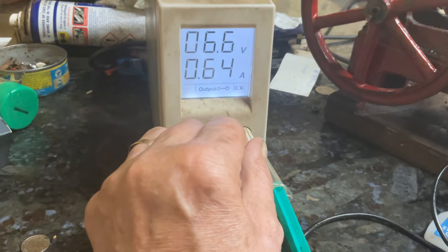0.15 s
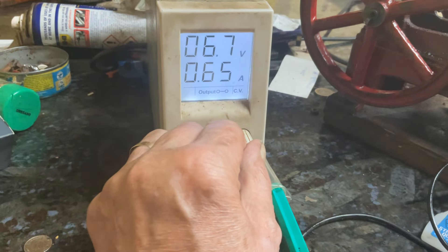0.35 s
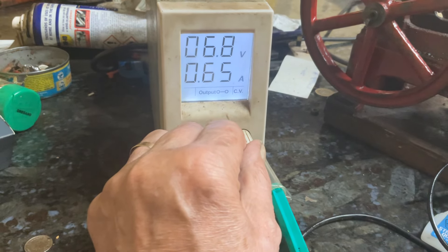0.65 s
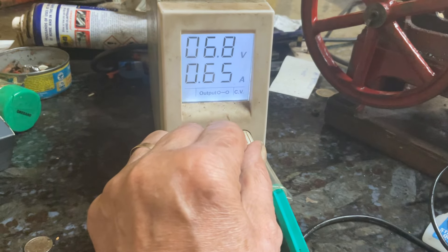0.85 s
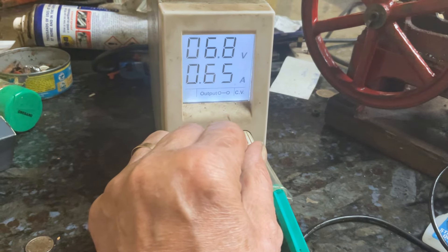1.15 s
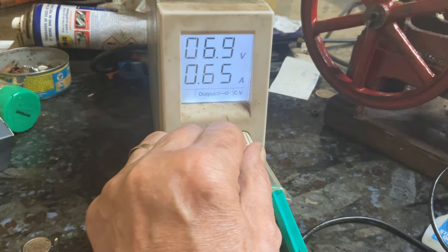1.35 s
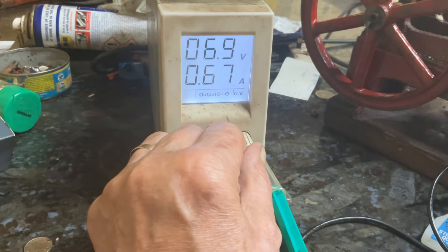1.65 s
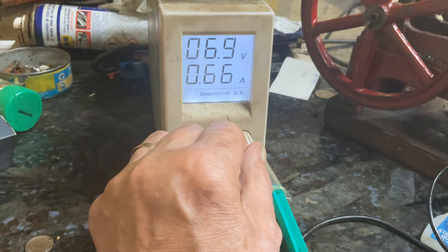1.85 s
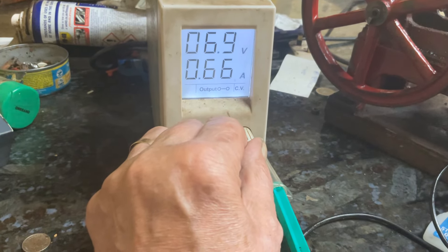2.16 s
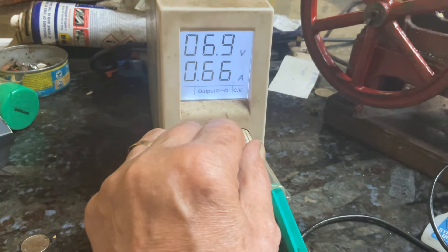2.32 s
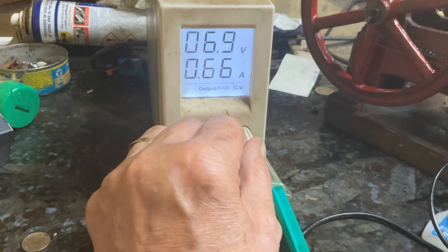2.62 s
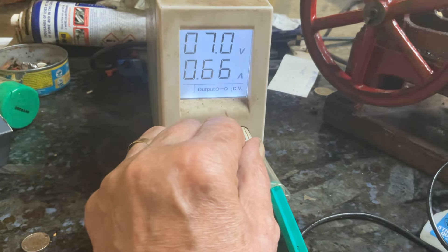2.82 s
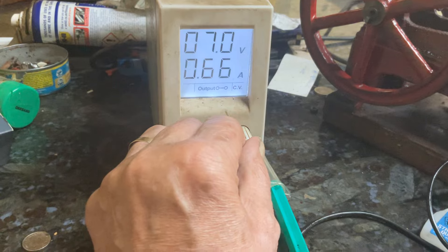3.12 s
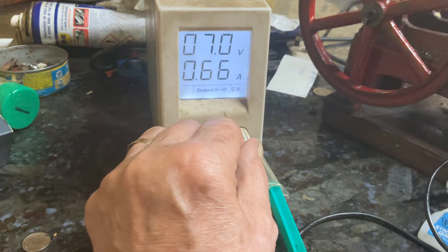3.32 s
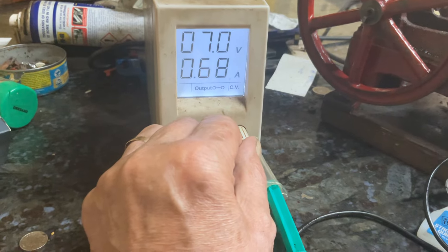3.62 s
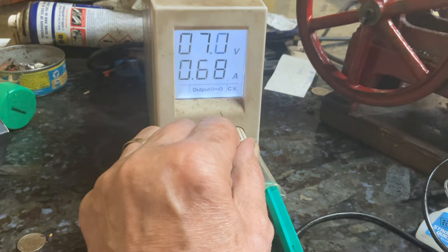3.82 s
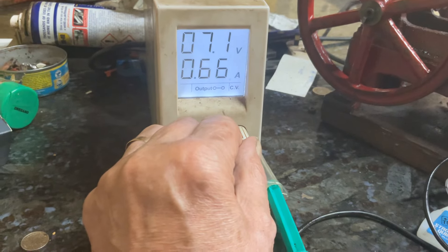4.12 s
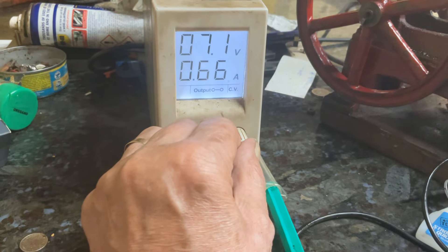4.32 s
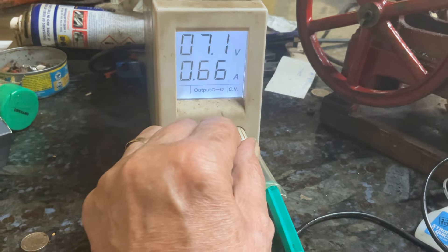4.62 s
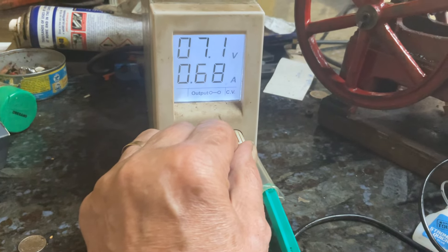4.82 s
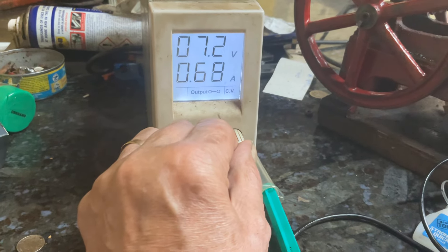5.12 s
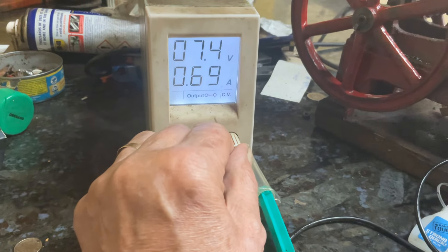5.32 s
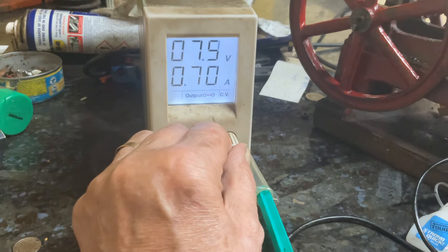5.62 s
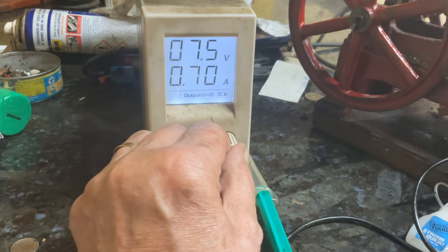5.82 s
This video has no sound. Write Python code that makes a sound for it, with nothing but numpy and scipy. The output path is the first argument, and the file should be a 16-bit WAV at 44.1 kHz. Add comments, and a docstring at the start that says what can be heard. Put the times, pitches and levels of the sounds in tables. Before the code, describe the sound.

Close, harsh electrical crackling runs from start to finish: dense, bright sparks across a plug gap, with a metallic ring and piercing top hiss. The pace rises unevenly, with short spurts. Beneath it, random dull pops and thumps dropping in pitch buffet the microphone, strongest between two and three and a half seconds. A small hard workshop adds short reflections and quiet steady air noise.

```python
"""An ignition unit on a workshop bench fires roughly 63 to 81 sparks a second across a plug gap.
Its rate follows its supply, with surges and an overall rise. Each breakdown is an impulse plus arc noise,
coloured by short rings of the plug, bench and wall reflections and a short diffuse tail.
Some sparks jolt the microphone into timed, dispersed thumps, strong to faint, that fall in pitch; soft thumps
flutter between them by chance. Steady noise gives the still air of the workshop."""
import sys
import numpy as np
from scipy import signal
from scipy.fft import rfft, irfft, next_fast_len
from scipy.io import wavfile
from scipy.ndimage import uniform_filter1d

SR = 44100
rng = np.random.default_rng(int(sys.argv[2]) if len(sys.argv) > 2 else 0)


def wav_out(sig):
    """Save sig, one row per channel (or a flat mono array), as 16-bit PCM at SR to the path in sys.argv[1]."""
    wavfile.write(sys.argv[1], SR, np.round(np.clip(np.atleast_2d(sig).T, -1, 1) * 32767).astype(np.int16))


N = 263178

# nominal repetition rate of the oscillator: (t/s, firing rate/Hz)
FIRING_RATE = [(0.0, 66), (0.3, 63), (0.42, 63), (0.7, 66.3), (1.25, 69), (1.42, 75.5), (1.6, 70),
               (2.1, 71), (2.62, 70.5), (2.9, 66.4), (3.3, 69), (3.48, 79), (3.7, 69), (4.4, 70.3),
               (4.62, 81), (4.72, 70.5), (5.15, 74.2), (5.97, 81)]
# timed thumps, from strong to faint: (t/s, relative low-thump level/dB, relative opening-pop level/dB)
TIMED_THUMPS = [(0.001, -17, -11), (0.0115, -26, -15), (0.3439, -17, -9), (0.377, -10, -7),
                (0.408, -10, -14.5), (0.4395, -14.5, -13), (0.5153, -11.5, -10), (0.5311, -13.5, -8),
                (0.5451, -8.5, -5), (0.5604, -22, -14.5), (0.6051, -10, -6.5), (0.649, -16, -23),
                (0.6916, -17, -14), (0.752, -23, -12), (0.7815, -11, -6.5), (0.8104, -23, -10),
                (0.8397, -14, -21), (0.8543, -21.5, -19.5), (0.883, -18, -20.5), (0.9112, -22.5, -15),
                (0.9254, -19, -17), (0.9408, -20.5, -17.5), (0.9993, -19.0, -14.5), (1.0137, -19.0, -15.0),
                (1.027, -23.5, -9), (1.0563, -16.0, -14.5), (1.1131, -28, -15), (1.1412, -18, -20.0),
                (1.1555, -12.5, -6), (1.1707, -20.5, -20), (1.229, -16.0, -11), (1.2426, -17.5, -16.5),
                (1.2593, -19.5, -9), (1.2736, -17.5, -17.0), (1.3265, -14.5, -8), (1.357, -23, -8),
                (1.466, -13, -14.5), (1.4798, -21.0, -16.0), (1.4946, -21, -22), (1.509, -18, -14),
                (1.5241, -18.0, -11), (1.5524, -19, -6), (1.5647, -25, -18), (1.5938, -7.0, -1.5),
                (1.608, -18, -15.5), (1.637, -16, -20), (1.6512, -20, -20.0), (1.666, -12, -9),
                (1.6802, -18.5, -13), (1.7394, -15, -6), (1.7525, -16, -17.5), (1.7669, -12.5, -10),
                (1.8086, -16.5, -24), (1.8238, -26, -16.0), (1.881, -16, -11), (1.938, -13.5, -15.0),
                (1.9666, -15.5, -6), (1.9935, -30, -6), (2.0077, -12.5, -5), (2.0503, -6, -3.5),
                (2.0645, -29, -10), (2.0786, -23.0, -17), (2.107, -20, -23), (2.1357, -6.0, -4.5),
                (2.163, -7.0, -2.5), (2.2768, -7, -6), (2.2925, -5.5, -2.5), (2.305, -33, -17.5),
                (2.3196, -19, -16.5), (2.3773, -19, -9), (2.493, -22, -22.5), (2.5649, -5, -2),
                (2.636, -23, -23.0), (2.6771, -11, -14.5), (2.6921, -4, -1.5), (2.7216, -21.0, -24),
                (2.7365, -0.5, 1.5), (2.7501, -21, -17.0), (2.809, -11.5, -9), (2.8972, -3.0, 0.5),
                (2.9118, -10.0, -13), (2.9251, -23, -14.5), (2.9568, -3.5, -0.5), (2.971, -8, -8),
                (2.9855, -11, -4.5), (3.0127, -14.5, -14), (3.028, -30.0, -19.5), (3.0433, -4, -2.5),
                (3.0734, -4, 1.5), (3.0859, -4, -9.0), (3.1002, -2.5, 2), (3.1276, -18, -18),
                (3.1431, -11, -9), (3.216, -14, -11), (3.2589, -19, -11), (3.2884, -13, -12),
                (3.3013, -13, -13.0), (3.3167, -4.5, -2.5), (3.3604, -11, -7), (3.4026, -20, -23.0),
                (3.4306, -16, -10), (3.444, -15, -16), (3.4582, -11.5, -5), (3.472, -21, -26),
                (3.5115, -22, -16.0), (3.5233, -22, -21.5), (3.5644, -20, -26), (3.5796, -28, -18.0),
                (3.5916, -20, -17.5), (3.6047, -21.5, -15), (3.6314, -22, -25.5), (3.721, -7.5, -7),
                (3.7343, -20, -13), (3.7484, -15.5, -14.5), (3.7629, -20, -21), (3.8058, -17, -19.5),
                (3.8204, -17, -19.0), (3.835, -23.0, -21.5), (3.8646, -25, -15), (3.909, -13.5, -15.0),
                (3.9363, -22, -18.5), (3.9512, -14.5, -12), (3.9658, -26, -11), (3.9943, -22, -17.0),
                (4.0216, -18.5, -14), (4.037, -10.0, -7), (4.0505, -18, -22), (4.0796, -19, -7),
                (4.136, -18.5, -19.0), (4.1501, -30, -20.5), (4.1639, -19, -12), (4.1793, -26, -17.5),
                (4.1945, -14.5, -9), (4.2086, -14.5, -13.5), (4.2383, -18, -9), (4.2824, -22, -16.5),
                (4.2963, -20.0, -17.0), (4.3111, -21, -17.0), (4.3257, -19, -17.5), (4.3535, -29, -25),
                (4.3819, -24, -19.5), (4.3947, -19.5, -22), (4.4392, -24, -16), (4.454, -25, -18.0),
                (4.4689, -20.0, -18.5), (4.568, -18, -20), (4.6221, -13.5, -14.0), (4.6355, -23, -23),
                (4.6476, -18, -20), (4.6757, -15.5, -13), (4.6893, -22, -19.0), (4.733, -22.0, -19.0),
                (4.7468, -22, -18.5), (4.7622, -16, -18), (4.8168, -22, -11), (4.9102, -20.5, -16.5),
                (4.9905, -21, -16.5), (5.0169, -23, -26), (5.0306, -19.5, -18.0), (5.083, -12.5, -12),
                (5.2383, -21.5, -19), (5.3026, -19.0, -22), (5.3548, -22, -22), (5.3821, -26, -16),
                (5.4211, -18.5, -22), (5.4339, -17, -21), (5.4468, -9.5, -11), (5.4598, -26, -17.0),
                (5.4736, -16, -6), (5.5224, -16.5, -15), (5.5343, -17.0, -17), (5.5589, -20, -23),
                (5.5984, -10.5, -6), (5.6233, -28, -23), (5.6368, -15, -16.0), (5.6481, -14, -16.0),
                (5.6843, -5.0, -1.5), (5.6975, -14, -8.0), (5.7102, -8.5, -4), (5.7227, -20, -16.0),
                (5.7488, -16, -8), (5.7609, -19.5, -20.0), (5.7727, -9.5, -6), (5.7971, -36, -20),
                (5.8195, -25, -24), (5.8576, -23, -7), (5.87, -12, -15.5), (5.8833, -18, -17.5),
                (5.8946, -11.5, -7.5)]
# spectrum of the spark source ahead of the workshop: (f/Hz, relative level/dB)
SPARK_COLOUR = [(50, -45), (150, -36), (550, -25.5), (800, -18), (1000, -14.5), (1220, -20), (1500, -14),
                (1830, -17), (2150, -14.5), (2420, -10.5), (3000, -14.5), (3450, -13), (3900, -15.5),
                (4900, -13), (5900, -10.5), (6300, -6), (6680, -4), (7050, -9), (7450, -16), (8100, -24),
                (9200, -20), (11000, -17.5), (11900, -12.5), (12400, -8), (13100, -4.5), (14150, -5),
                (14800, 1.5), (15030, -2.5), (15450, 0.5), (15800, -0.5), (16300, -37)]
# spectrum shared by thumps and pops: (f/Hz, relative level/dB)
THUMP_COLOUR = [(25, -38), (42, -10), (80, 4.5), (130, 2), (400, -3.5), (620, -9), (850, -11), (1100, -16),
                (2300, -24), (6000, -37.5)]
# resonances of the plug and its bracket: (f/Hz, bandwidth/Hz, level re direct crack/dB)
PLUG_RINGS = [(1000, 70, -3), (2430, 214, 5), (6500, 390, -20)]
# reflections from clutter on the bench: (delay/ms, relative level/dB)
BENCH_PATHS = [(1.15, 0), (1.85, -1), (3.5, -8)]
# reflections from walls and shelves: (delay/ms, relative level/dB)
WALL_PATHS = [(6.05, -1), (7.0, -4), (7.33, -4), (7.72, -6), (8.45, 0), (8.9, -2), (9.7, -1)]
# spectral weight of the near, wall and diffuse paths against each other: (f/Hz, relative level/dB)
NEAR_TILT = [(60, -1), (1000, 3), (1900, -0.5), (2450, 0.5), (3200, 1.5), (5000, -1.5), (7000, 5),
             (11000, -2.5), (15000, -8.5)]
WALL_TILT = [(60, -25), (500, -25), (1000, -15.5), (1900, -3), (2450, -10), (3000, 2.5), (6600, -7.5),
             (10000, -1.5), (14500, 7)]
ROOM_TILT = [(60, 3), (500, -5), (1000, 0), (1500, 0.5), (2400, 3.5), (3200, 4), (6000, 8.5), (10000, 4),
             (14500, 1)]
# slow change of the topmost hiss: (t/s, relative level/dB)
TOP_HISS = [(0, 1), (3.6, -1), (4.5, 1.6), (5.7, 1.5)]
# central peak level of the chance soft thumps: (t/s, level/dB)
SOFT_THUMPS = [(0.3, -36), (0.5, -22.5), (2.45, -29), (3.0, -23), (4.3, -31), (5.15, -31), (5.5, -29)]
# spectrum of the still workshop air: (f/Hz, relative level/dB)
AIR_COLOUR = [(28, -38), (70, 2), (200, -2), (600, -10), (2000, -15), (15000, -20.5)]

THUMP_LAG_S = .0069  # a thump starts as the wall echoes arrive
SOFT_SHARE, SOFT_SPREAD_DB = .4, 3.5  # chance that an eligible spark thumps softly; level deviation
RECOIL, RECOIL_S = 0.54, 0.001282  # opposite rebound of a pop: share at 0 dB table level, delay
SIZZLE_HZ = 5000  # lower edge of the arc noise
DROOP_HZ = 1570  # below this the crack's lows come out late
BENCH_DB, BENCH_HZ = 0.5, 2700  # bench reflections: level, lower edge
TOP_HZ = 15740  # upper edge of the final sound

T = np.arange(N) / SR
SIZE = next_fast_len(N + SR)  # transform length, padded for tails
HZ = np.maximum(np.arange(SIZE // 2 + 1) * SR / SIZE, 1)


def undb(db):
    """Amplitude ratio: decibels become a linear gain."""
    return 10 ** (np.asarray(db) / 20)


def level(x, db):
    """Root-mean-square level: scale a signal to the stated value."""
    return x * undb(db) / np.sqrt(np.mean(x ** 2))


def colour(points):
    """Spectral envelope: interpolate decibels over logarithmic frequency."""
    hz, db = np.transpose(points)
    return undb(np.interp(np.log(HZ), np.log(hz), db))


def through(x, response):
    """Linear filtering: multiply the spectrum by a frequency response."""
    return irfft(rfft(x, SIZE) * response, SIZE)[:N]


def clicks(times, sizes, order=8):
    """Band-limited impulses: windowed sincs may fall between samples."""
    at = np.asarray(times)[:, None] * SR
    taps = np.floor(at).astype(int) + np.arange(1 - order, order + 1)
    window = np.cos(np.pi * (taps - at) / (2 * order)) ** 2
    shape = np.sinc(taps - at) * window
    inside = (taps >= 0) & (taps < N)
    return np.bincount(taps[inside], (sizes[:, None] * shape)[inside], N)


def firing_times(scatter_s):
    """Relaxation oscillation: phase drifts to meet each timed thump; other breakdowns come early or late."""
    turns = np.cumsum(np.interp(T, *np.transpose(FIRING_RATE))) / SR
    timed = np.transpose(TIMED_THUMPS)[0] - THUMP_LAG_S
    at_timed = np.interp(timed, T, turns)
    # each spark with a timed thump takes a whole number of turns
    steps = np.maximum(1, np.round(np.diff(at_timed, prepend=0)))
    whole = np.cumsum(steps)
    turns = turns + np.interp(T, timed, whole - at_timed)
    firings = np.arange(np.ceil(turns[0]), turns[-1])
    untimed = ~np.isin(firings, whole)
    stray = scatter_s * rng.laplace(size=SR)[:len(firings)] * untimed
    return np.sort(np.interp(firings, turns, T) + stray)


def strengths(times, charge, spread_db):
    """Charge storage: a spark that comes late has stored more charge and cracks louder."""
    rate = np.interp(times[1:], *np.transpose(FIRING_RATE))
    wait = np.r_[1, np.diff(times) * rate]  # in nominal periods
    chance = undb(spread_db * rng.standard_normal(SR)[:len(times)])
    return wait ** charge * chance


def sparks(times, sizes, sizzle_db, sizzle_s, crack_db):
    """Electrical breakdown: a thin snap plus decaying arc noise that is new every time."""
    cracks = clicks(times, sizes)
    # energy decays twice as fast as amplitude
    arc_energy = signal.lfilter([1], [1, -np.exp(-2 / (sizzle_s * SR))], cracks ** 2)
    arc = np.sqrt(arc_energy) * rng.standard_normal(N)
    sizzle = through(arc, 1 / (1 + (SIZZLE_HZ / HZ) ** 2))
    source = level(cracks, 0) + level(sizzle, sizzle_db)
    sound = workshop(through(source, colour(SPARK_COLOUR)), t60_s=0.26, build_s=0.0042, droop_cycles=1.1)
    top = through(sound, 1 - 1 / (1 + (HZ / 15100) ** 200))  # the hiss above 15.1 kHz
    hiss_gain = undb(np.interp(T, *np.transpose(TOP_HISS)))
    return level(sound - top + hiss_gain * top, crack_db)


def plug_rings():
    """Damped resonance: the crack excites the modes of the plug and its bracket."""
    return sum(undb(db) / (1 + 1j * (HZ ** 2 - hz ** 2) / (HZ * width)) for hz, width, db in PLUG_RINGS)


def echoes(paths):
    """Specular reflection: a few delayed paths whose gains have unit energy in all."""
    ms, db = np.transpose(paths)
    seconds = ms / 1000
    gains = undb(db) / np.linalg.norm(undb(db))
    return sum(g * np.exp(-2j * np.pi * HZ * s) for s, g in zip(seconds, gains))


def scatter(length_s):
    """Rough-surface scattering: random delay over frequency spreads a click but keeps its colour."""
    knots = np.arange(0, SR / 2, 500)
    delay = length_s * np.interp(HZ, knots, rng.uniform(-1, 1, len(knots)))
    return np.exp(-2j * np.pi * np.cumsum(delay) * SR / SIZE)


def workshop(source, t60_s, build_s, droop_cycles, count=4):
    """Room response: near sound, reflections and a drifting diffuse tail spread the crack in time."""
    bench_edge = 1 / (1 + (BENCH_HZ / HZ) ** 4)
    bench = echoes(BENCH_PATHS) * scatter(.00028) * undb(BENCH_DB) * bench_edge
    low = np.minimum(HZ / DROOP_HZ, 1)
    droop = np.exp(-2j * np.pi * droop_cycles * (np.log(low) - low + 1))
    near = (1 + plug_rings() + bench) * scatter(.00025) * droop * colour(NEAR_TILT)
    early = near + echoes(WALL_PATHS) * scatter(.0005) * colour(WALL_TILT)
    build = 1 - np.exp(-(T / build_s) ** 2)
    fade = np.exp(-np.log(1000) * T / t60_s) * build
    tilt, out = colour(ROOM_TILT), 0
    for k in range(count):  # one tail gives way to the next
        tail = rng.standard_normal(N) * fade
        tail = rfft(tail / np.linalg.norm(tail), SIZE) * tilt
        # dividing by the smoothed spectrum keeps the crack's broad colour
        broad = np.sqrt(uniform_filter1d(np.abs(early + tail) ** 2, size=1500))
        share = np.maximum(0, 1 - np.abs(T / T[-1] * (count - 1) - k))
        out = out + share * through(source, early / broad)
        out = out + np.sqrt(share) * through(source, tail / broad)
    return out


def thumps(times, usual_db, thump_db, pop_db, pop_hz, again, again_s, lag_cycles):
    """Dispersion: sparks nudge or jolt the microphone; lows lag the pop, so each pulse falls in pitch."""
    s, low_db, high_db = np.transpose(TIMED_THUMPS)
    nudge_sizes = undb(usual_db) * rng.standard_normal(SR)[:len(times)]
    nudges = clicks(times + THUMP_LAG_S, nudge_sizes)
    # a later echo pushes or pulls once more, which gives each thump its own colour
    late, push = rng.uniform(-1, 1, (SR, 2))[:len(s)].T
    size = undb(low_db + thump_db)
    second = clicks(s + again_s * (1 + late / 2), size * again * push)
    blows = clicks(s, size) + second + flutter(times) + nudges
    # a pop springs back, the more the stronger it is
    pop = undb(high_db + pop_db)
    recoil = pop * np.minimum(RECOIL * undb(high_db), 1)
    pops = clicks(s, pop) - clicks(s + RECOIL_S, recoil)
    shape, lows = colour(THUMP_COLOUR), 1 / (1 + (HZ / pop_hz) ** 6)
    # each frequency is late by the same number of its own cycles
    smear = np.exp(-2j * np.pi * lag_cycles * np.log(HZ / 1080))
    pulse = irfft(smear * shape / shape.mean(), SIZE)
    age = np.minimum(np.arange(SIZE), SIZE - np.arange(SIZE)) / SR
    fall = rfft(pulse / (1 + (age / .03) ** 8))  # fades steeply around 30 ms
    return through(blows, fall * lows) + through(pops, fall * (1 - lows))


def flutter(times):
    """Random excitation: a chance share of the sparks between the timed thumps gives soft ones."""
    s = times + THUMP_LAG_S
    luck, spread = rng.random(SR)[:len(s)], rng.standard_normal(SR)[:len(s)]
    nearest_timed = np.abs(s[:, None] - np.transpose(TIMED_THUMPS)[0]).min(axis=1)
    between = nearest_timed > THUMP_LAG_S
    peak_db = np.interp(s, *np.transpose(SOFT_THUMPS)) + SOFT_SPREAD_DB * spread
    return clicks(s, undb(peak_db) * between * (luck < SOFT_SHARE))


def still_air(air_db):
    """Stationary noise: white noise shaped to the quiet background of the workshop."""
    return level(through(rng.standard_normal(N), colour(AIR_COLOUR)), air_db)


def scene():
    """Superposition: sparks, their thumps and the still air add linearly."""
    times = firing_times(scatter_s=.00022)
    sizes = strengths(times, charge=0.34, spread_db=0.65)
    crackle = sparks(times, sizes, sizzle_db=-12.5, sizzle_s=0.0003, crack_db=-19.0)
    low = thumps(times, usual_db=-33.5, thump_db=1, pop_db=-1.5, pop_hz=576,
                 again=0.61, again_s=0.0012, lag_cycles=1.524)
    return (crackle + low + still_air(air_db=-44))[None]


def record(dry):
    """Low-pass filtering: the sound ends steeply just below 15.8 kHz."""
    return through(dry[0], 1 / np.sqrt(1 + (HZ / TOP_HZ) ** 1400))[None]


dry = scene()
out = record(dry)
wav_out(out)
```